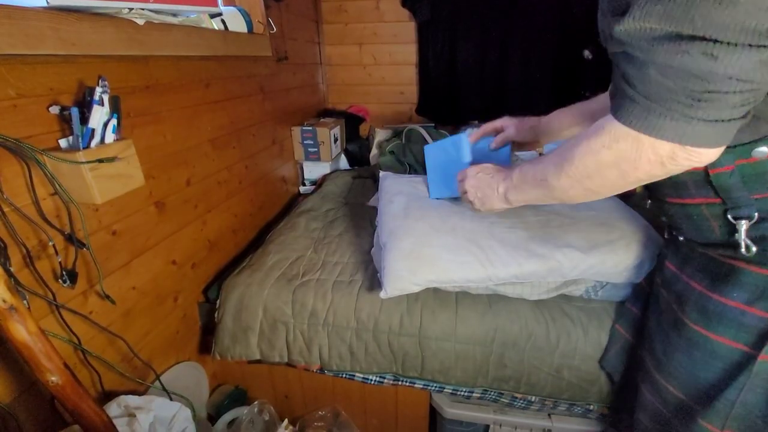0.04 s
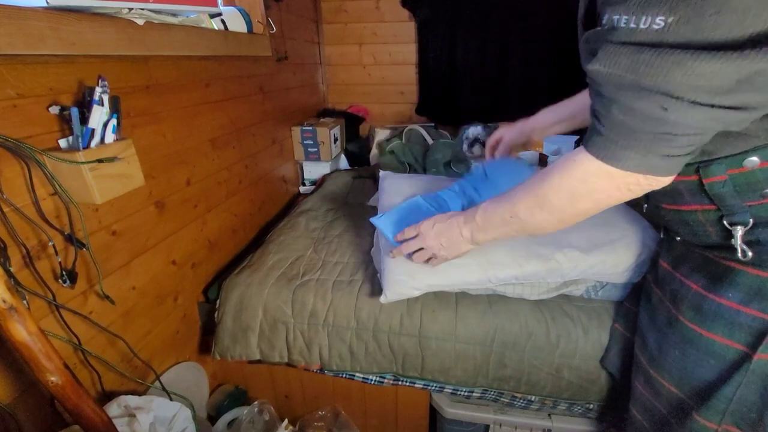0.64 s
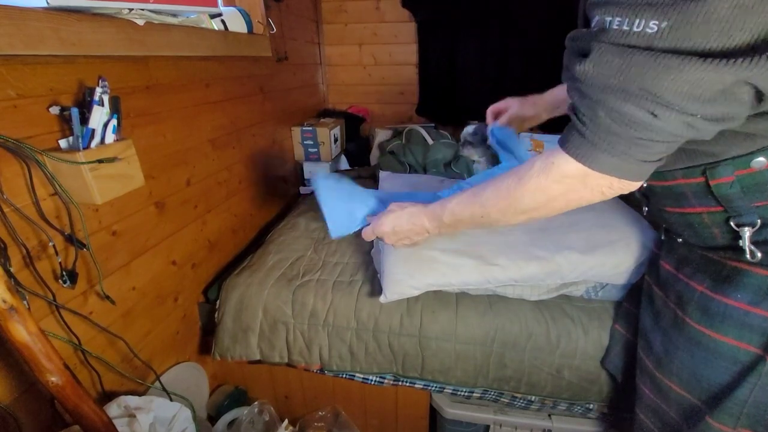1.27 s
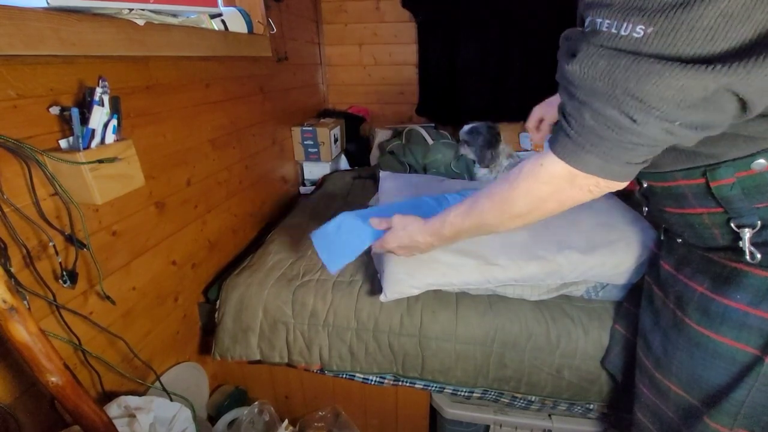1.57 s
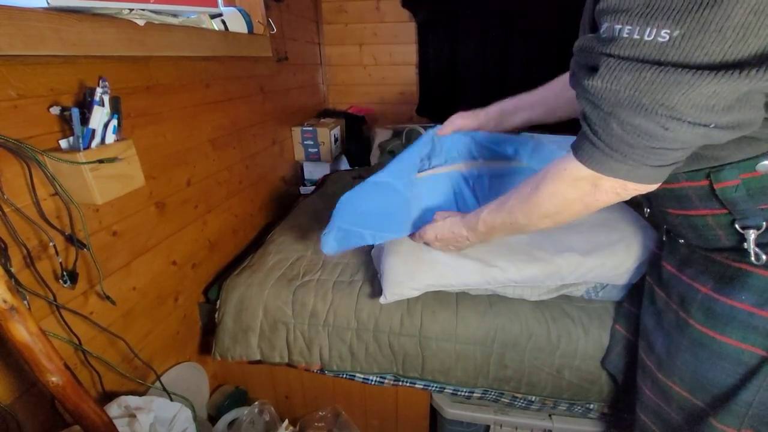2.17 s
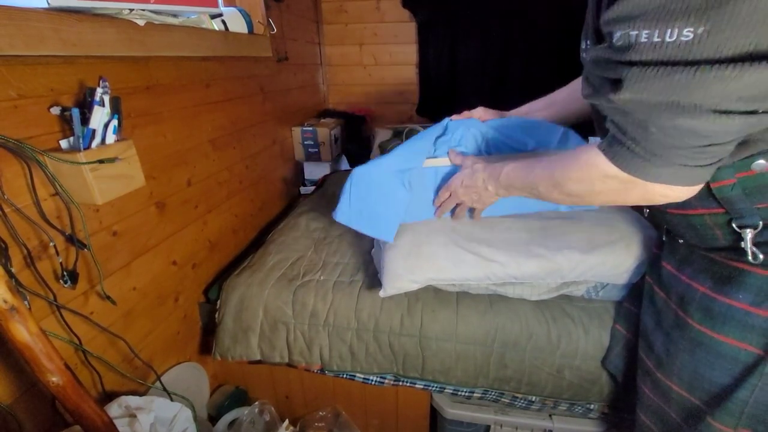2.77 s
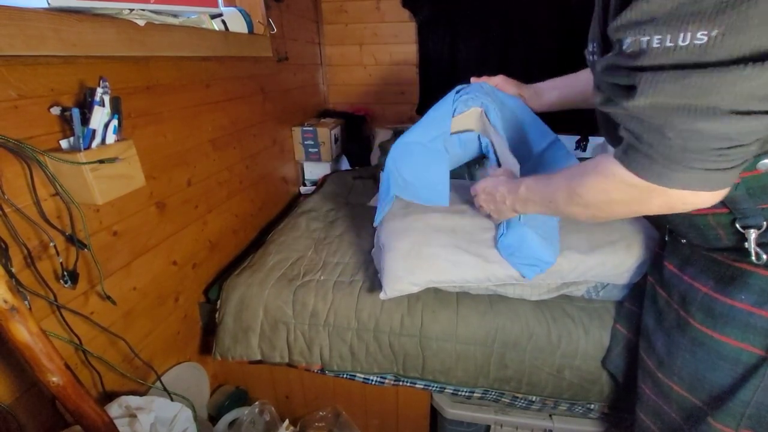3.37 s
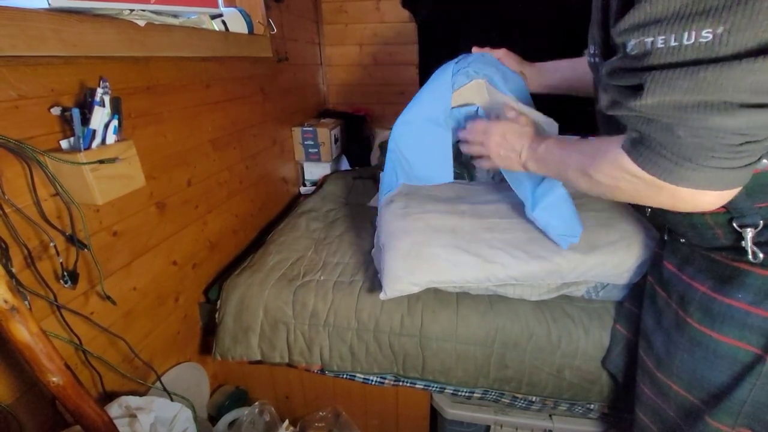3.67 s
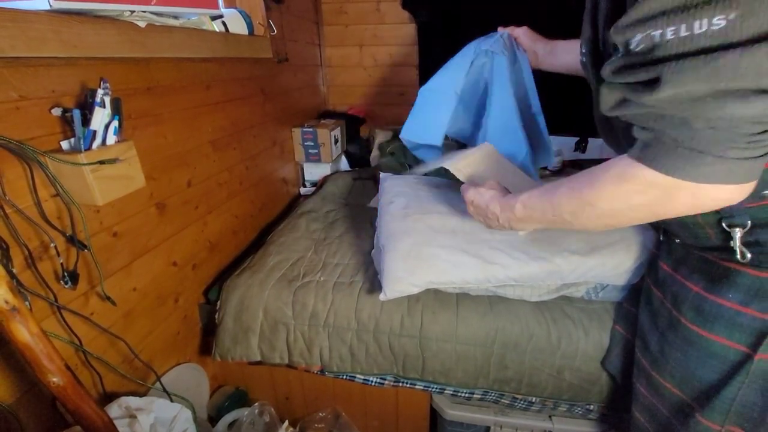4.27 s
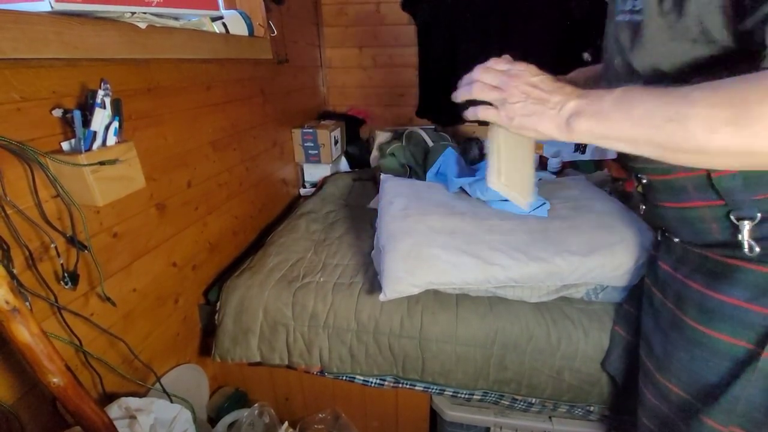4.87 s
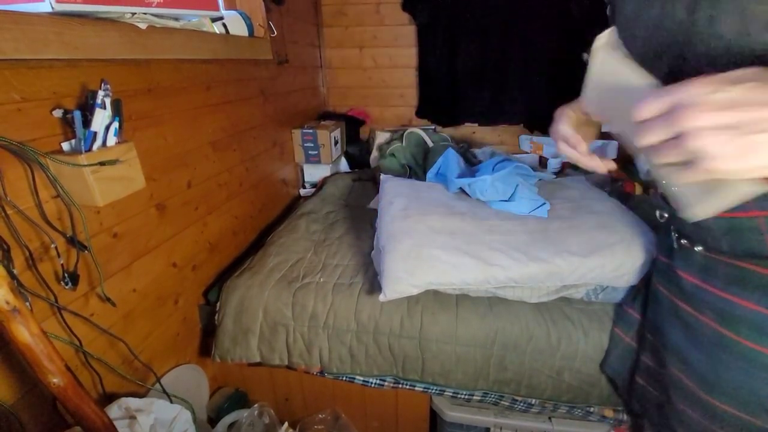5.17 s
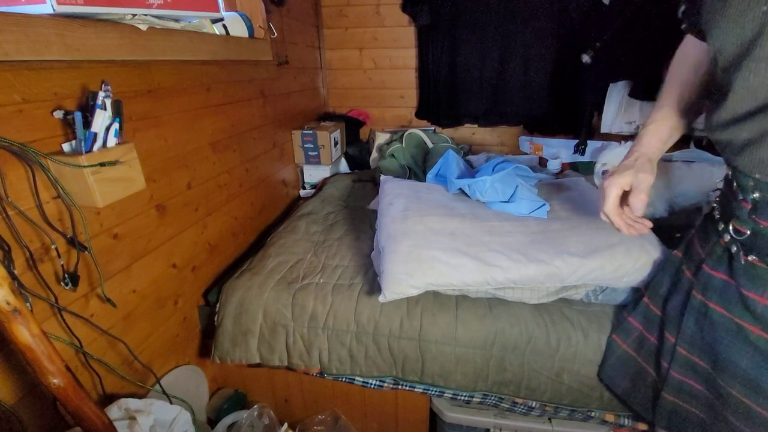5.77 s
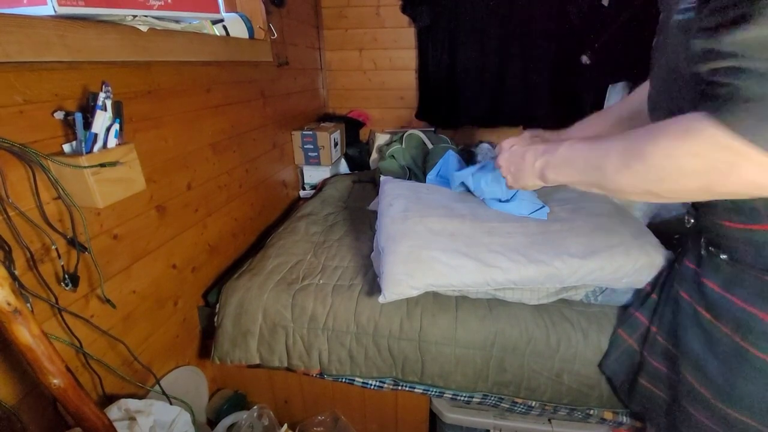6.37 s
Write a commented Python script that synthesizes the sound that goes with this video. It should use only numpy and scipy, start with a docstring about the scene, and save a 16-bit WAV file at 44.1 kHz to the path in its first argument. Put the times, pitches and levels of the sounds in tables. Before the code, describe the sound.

Soft fabric swishes, crinkles and hand thumps in a small room, ending with cardboard hitting floorboards as a vehicle nears outside.

```python
"""Unfolding a pillowcase

In a small wooden room, cloth slides over a pillow: stick-slip hiss and rub, creases flicking open,
stirred air booming and fluttering. The cardboard insert scrapes out, is knocked by the fingers and
lands ringing on the floorboards. Road noise through the walls swells at the end as a vehicle nears."""
import sys
import numpy as np
from scipy import signal
from scipy.fft import rfft, irfft, next_fast_len
from scipy.io import wavfile
from scipy.ndimage import uniform_filter1d, map_coordinates

SR = 44100
rng = np.random.default_rng(int(sys.argv[2]) if len(sys.argv) > 2 else 0)


def master(y):
    """Save y as 16-bit WAV."""
    cut = np.clip(np.atleast_2d(y).T, -1, 1)
    pcm = np.round(cut * 32767)  # scale
    wavfile.write(sys.argv[1], SR, pcm.astype(np.int16))


N = 287532

# cloth on cloth: start t/s, rise/s, fall/s, hiss level/dB, rub re hiss/dB
CLOTH_SLIDES = [(0.0, 0.0063, 0.11, -66, 7.5), (0.1, 0.052, 0.29, -72, 1), (0.54, 0.084, 0.056, -75, -5),
                (0.625, 0.03, 0.069, -66.5, -3), (0.75, 0.037, 0.35, -81, -7), (1.24, 0.061, .05, -76, -19),
                (1.45, 0.012, 0.023, -77, -6), (1.54, 0.048, .05, -74, -12),
                (1.665, 0.16, 0.029, -65.5, -15), (1.89, 0.063, 0.052, -75.5, -15),
                (2.04, 0.066, 0.052, -62.5, -13), (2.129, 0.037, 0.059, -55, -1.5),
                (2.235, 0.044, 0.23, -68, -10), (2.53, 0.012, 0.24, -63.5, -16.5),
                (2.669, 0.073, 0.1, -52.5, -5), (2.86, 0.057, .09, -62.5, -11),
                (3.05, 0.025, 0.071, -63.5, -9), (3.092, .008, 0.013, -55.5, -1),
                (3.185, 0.063, 0.066, -53.5, -7), (3.37, 0.016, 0.18, -62, -21),
                (3.57, 0.18, 0.036, -62.5, -7.5), (3.831, 0.073, 0.039, -53, -2),
                (3.92, 0.13, 0.089, -43, -6), (4.13, 0.059, 0.04, -49.5, -3.5),
                (4.321, 0.095, 0.072, -54.5, -6.5), (4.5, .02, 0.38, -78, 0)]
# thread hiss: f/Hz, density/dB
THREAD_SPECTRUM = [(1500, -17), (3500, -7.5), (5500, -1.5), (8000, -2.5), (9200, -3), (11500, 3.5),
                   (15500, 1.5), (17000, -6.5)]
# fold rub: f/Hz, density/dB
FOLD_SPECTRUM = [(100, -26), (300, 8), (700, 7), (1400, 7.5), (2100, 3), (3200, -1), (4600, -0.5),
                 (7000, -14), (14000, -52)]
def cloth_slide(grip_db):
    """Threads hiss and folds rub as the grip catches and lets go. Returns sound, hiss envelope."""
    hiss_env, rub_env = slide_envelopes(CLOTH_SLIDES)
    hiss = hiss_env * stick_slip(THREAD_SPECTRUM, slips_per_s=12000, scatter_db=1.5, drift_db=0.9)
    rub = rub_env * stick_slip(FOLD_SPECTRUM, slips_per_s=5000, scatter_db=1, drift_db=2.5)
    return amp(grip_db + 0.5) * hiss + amp(grip_db + 4.5) * rub, hiss_env


# card on cloth, sleeve or floor: start t/s, rise/s, fall/s, hiss level/dB, rasp re hiss/dB
CARD_SCRAPES = [(4.74, 0.052, 0.086, -46, 1), (4.962, 0.05, 0.04, -57.5, -2.5),
                (5.07, 0.11, 0.027, -51.5, -7), (5.195, 0.014, 0.08, -58.5, 5),
                (5.295, .07, 0.14, -51.5, -1.5), (5.52, 0.14, 0.0065, -53, -2), (5.88, .02, .05, -61, 7.5)]
# card rasp: f/Hz, density/dB
RASP_SPECTRUM = [(100, -14), (300, 10.5), (700, 8), (1400, 3), (2100, 2), (3200, 0.5), (4600, -2),
                 (7000, -11.5), (14000, -49)]
def card_scrape(grip_db):
    """Dragged card hisses and rasps by stick-slip. Returns sound, hiss envelope."""
    hiss_env, rasp_env = slide_envelopes(CARD_SCRAPES)
    hiss = hiss_env * stick_slip(THREAD_SPECTRUM, slips_per_s=12000, scatter_db=1.5, drift_db=0.9)
    rasp = rasp_env * stick_slip(RASP_SPECTRUM, slips_per_s=5000, scatter_db=1, drift_db=3.5)
    return amp(grip_db + 0.5) * hiss + amp(grip_db + 4.5) * rasp, hiss_env


def slide_envelopes(slides, swell_db=8.5, grab_db_per_s=656, release_db_per_s=376):
    """Each slide swells to its fastest moment and eases off. Returns hiss and rub envelopes."""
    t = np.arange(N) / SR
    hiss_power, rub_power = np.zeros((2, N))
    for start_s, rise_s, fall_s, level_db, rub_db in slides:
        past_peak_s = t - start_s - rise_s
        off_peak = np.clip(np.maximum(-past_peak_s / rise_s, past_peak_s / fall_s), 0, 1)
        before_db = grab_db_per_s * np.maximum(start_s - t, 0)
        after_db = release_db_per_s * np.maximum(past_peak_s - fall_s, 0)
        power = amp(level_db - swell_db * off_peak ** 2 - np.minimum(before_db + after_db, 120)) ** 2
        hiss_power += power
        rub_power += power * amp(rub_db) ** 2
    return np.sqrt(hiss_power), np.sqrt(rub_power)


def stick_slip(spectrum, slips_per_s, scatter_db, drift_db):
    """Dense tiny releases of uneven size; the colour drifts as folds open and close."""
    sizes = (rng.random(N) < slips_per_s / SR) * amp(scatter_db * rng.standard_normal(N))
    slips = stereo(sizes * white(), lambda hz: amp(at_hz(spectrum, hz)))
    return colour_drift(slips, drift_db)


# creases opening: t/s, level/dB, centre f/Hz
CREASES = [(0.9872, -61.5, 11700), (2.126, -39.5, 13600), (2.6763, -41, 12500), (3.043, -52, 12100),
           (3.092, -44, 14600), (3.367, -46, 7990), (3.574, -51.5, 9370), (3.611, -49.5, 14600),
           (3.6697, -41.5, 15000), (3.725, -41.5, 13900), (3.7435, -43, 12100), (3.8223, -44, 10300),
           (3.872, -38, 3360), (4.212, -35.5, 12600), (4.312, -50, 10700), (4.8676, -26.5, 8100),
           (4.873, -36, 7670), (4.9751, -44, 11300), (5.018, -38, 14160), (5.956, -41, 5200)]
def crease_flicks():
    """A crease pops open in a short burst, brightest around a pitch set by its size."""
    out, t = np.zeros((2, N)), np.arange(SR // 4) / SR
    shape = [(0.12, -20), (0.73, -7), (1, 0), (1.15, -3), (2, -7)]  # f/centre, density/dB
    for start_s, level_db, centre_hz in CREASES:
        spectrum = [(ratio * centre_hz, db) for ratio, db in shape]
        pop = burst(spectrum, t, t60_s=0.077, spike=1.7)
        threads = amp(-8.5) * burst(THREAD_SPECTRUM, t, t60_s=0.091)
        add(out, start_s, amp(level_db - 8.5) * (pop + threads))
    return out


# swings of sheet and arms: t/s, level/dB
AIR_PUFFS = [(0.03, -53.5), (0.76, -57), (1.28, -65), (1.6, -58.5), (1.84, -64), (2.14, -50), (2.789, -50),
             (2.97, -50), (3.28, -50), (3.54, -50.5), (3.85, -47), (4.09, -45.5), (4.27, -54),
             (4.48, -48.5), (4.61, -46.5), (4.88, -43.5), (5.0, -51), (5.19, -41), (5.66, -43)]
# stirred air: f/Hz, density/dB
BOOM_SPECTRUM = [(15, -44), (28, -18), (45, -8.5), (62, 10), (85, 2), (105, -4), (140, 1.5), (175, -27),
                 (260, -66)]
# flapping sheet: f/Hz, density/dB
FLUTTER_SPECTRUM = [(90, -23), (160, -12.5), (220, 0.5), (290, -8.5), (400, -5.5), (520, -23), (900, -57)]
def billow(slide_env, follow_s=0.12, puff_half_s=0.044, brisk_db=-50, taut_db=-64.5):
    """The sheet booms more the faster it slides; flutter grows until it is taut; swings puff air."""
    t = np.arange(N) / SR
    stir = np.abs(uniform_filter1d(slide_env, size=int(follow_s * SR)))
    puffs = sum(amp(db) / (1 + ((t - peak_s) / puff_half_s) ** 4) for peak_s, db in AIR_PUFFS)
    boom_env = amp(-54.5) * (stir / amp(brisk_db)) ** 0.4
    boom = np.hypot(boom_env, puffs) * amp(1.4 * wobble(12)) * noise(BOOM_SPECTRUM)
    tautness = stir / np.hypot(stir, amp(taut_db))
    flutter = amp(-57.5 + 1.6 * wobble(25)) * tautness * noise(FLUTTER_SPECTRUM)
    return boom + flutter


# hands on pillow and card: t/s, level/dB, f/Hz, slap/dB, tick/dB, thump t60/s
HAND_HITS = [(0.006, -35, 671, -9, -20.5, .07), (0.012, -37.5, 131.4, -25, -41, 0.19),
             (0.649, -39.5, 335, -2.5, -42, 0.094), (0.684, -31, 285, -12, -46, 0.063),
             (0.688, -37.5, 428, -11, -31, 0.047), (0.987, -60, 404, 5, -10, .08),
             (1.595, -37, 300, -24.5, -38, 0.075), (3.825, -38, 287, 0.5, -21.5, 0.063),
             (4.372, -36, 424, -17, -25, 0.053), (4.887, -30.5, 425, 0, -10, 0.03),
             (5.054, -34, 456, -3.5, -6.5, 0.099), (5.191, -31, 279, -15, -16, 0.059)]
# skin slap: f/Hz, density/dB
SLAP_SPECTRUM = [(200, 7), (600, 10.5), (1500, 2.5), (2500, -15), (5000, -35), (15000, -21)]
# struck card: f/Hz, density/dB
CRACK_SPECTRUM = [(25, -13), (70, 0), (300, 8), (900, 1), (1900, -3), (3000, -8.5), (5000, -6), (8000, -15),
                  (12000, -15.5), (16000, -18)]
def hand_knocks():
    """A hand gives a dull thump, a slap of skin and a tick on the stiff card."""
    out, t = np.zeros((2, N)), np.arange(SR // 4) / SR
    for start_s, level_db, pitch_hz, slap_db, tick_db, t60_s in HAND_HITS:
        body = stereo(white(len(t)), lambda hz: resonance(hz, pitch_hz, 0.8 * pitch_hz) ** 2)
        tone = np.sin(2 * np.pi * pitch_hz * t)
        thump = (0.5 * body + 0.87 * tone) * decay(t, 0.0022, t60_s)
        slap = amp(slap_db - 3) * burst(SLAP_SPECTRUM, t, t60_s=0.069, spike=6.4)
        tick = amp(tick_db + 4) * burst(CRACK_SPECTRUM, t, t60_s=0.13, spike=8.4)
        add(out, start_s, amp(level_db - 0.5) * (thump + slap + tick))
    return out


# card on floor, edge first, then flat: t/s, level/dB, crack/dB, thud/dB
FLOOR_CONTACTS = [(5.820, -24.5, 4.5, 7), (5.837, -32, 11.5, -7), (5.843, -17, -17, -2.5),
                  (5.8464, -9, -8.5, -14.5), (5.856, -23.5, -16, 2)]
# card and floorboard modes: f/Hz, level/dB, t60/s
CARD_FLOOR_MODES = [(120, -7.5, 0.16), (170.4, -6, 0.27), (242, -11.5, 0.12), (330, -21, 0.3),
                    (437.5, -9.5, 0.16), (521, -12.5, 0.15), (734, -9, 0.09), (803, -13, 0.073),
                    (1053, -11.5, .1), (1345, 3, 0.056), (1382, -5, 0.039), (1585, -9.5, 0.049),
                    (1686, -10, 0.054), (2470, -2.5, 0.034), (2370, -23, 0.047), (3770, -15, 0.036)]
def card_landing(thud_hz=86, skid_start_s=5.843):
    """Contacts crack, ring card and boards, and thud with a puff of trapped air; the card skids."""
    out, t = np.zeros((2, N)), np.arange(SR // 2) / SR
    for start_s, level_db, crack_db, thud_db in FLOOR_CONTACTS:
        ring = np.zeros((2, len(t)))
        for hz, mode_db, t60_s in CARD_FLOOR_MODES:
            envelope = amp(mode_db + rng.normal(0, 1)) * decay(t, 0.00043, t60_s)
            channel_phase = min(hz / 900, 1) * rng.normal(0, 1, (2, 1))
            ring += envelope * np.sin(2 * np.pi * hz * t + channel_phase)
        crack = amp(crack_db) * burst(CRACK_SPECTRUM, t, t60_s=0.067, spike=8.3)
        thud = np.sin(2 * np.pi * thud_hz * t) * decay(t, attack_s=0.01, t60_s=0.25)
        puff = amp(-4) * burst(FLUTTER_SPECTRUM, t, t60_s=0.2)
        add(out, start_s, amp(level_db - 8) * (ring + crack + amp(thud_db) * (thud + puff)))
    skid_rasp = burst(RASP_SPECTRUM, t, t60_s=0.12)
    skid_hiss = amp(-8.5) * burst(THREAD_SPECTRUM, t, t60_s=0.11)
    add(out, skid_start_s, amp(-24) * (skid_rasp + skid_hiss))
    return out


# nearby boards: left delay/s, right delay/s, level/dB
PANEL_ECHOES = [(.0011, 0.0016, -28), (.0027, 0.0029, -13), (.0046, .0051, -6), (.0093, 0.0059, -15.5)]
def panelling(x, low_hz=400, high_hz=8000):
    """Early reflections comb the midrange; their top treble is scattered away."""
    def response(hz):
        echoes = sum(amp(db) * np.exp(-2j * np.pi * hz * np.array([[left_s], [right_s]]))
                     for left_s, right_s, db in PANEL_ECHOES)
        return 1 + echoes * hz / (hz + low_hz) / (1 + (hz / high_hz) ** 2)
    return filtered(x, response)


# room decay: f/Hz, t60/s
WALL_DECAY = [(100, 0.81), (500, 0.25), (3000, 0.062), (8000, 0.24), (15000, 0.23)]
def room_reverb(x, predelay_samples=200):
    """Wooden walls return a short tail, different in each channel."""
    hz, t, bins = signal.stft(white(SR // 2), SR, nperseg=256)
    decay_db = -60 * t / at_hz(WALL_DECAY, hz)[:, None]
    tail = signal.istft(bins * amp(decay_db), SR, nperseg=256)[1]
    tail = np.pad(tail / np.linalg.norm(tail[0]), ((0, 0), (predelay_samples, 0)))
    return signal.fftconvolve(x, tail, axes=1)[:, :N]


# vehicle approach: t/s, tyre level/dB, engine level/dB
APPROACH = [(0.0, -65.5, -65.5), (1.2, -68, -69), (2.7, -61.5, -59), (4.5, -58.5, -53), (5.65, -55, -46),
            (5.95, -48, -42.5), (6.25, -44.5, -40), (6.52, -40, -38)]
# far road: f/Hz, density/dB
FAR_ROAD_SPECTRUM = [(200, -10.5), (400, -1.5), (520, -13), (720, -4.5), (980, 3), (1350, -9),
                     (1800, -18.5), (2800, -34)]
# tyres through walls: f/Hz, density/dB
TYRE_SPECTRUM = [(150, -12.5), (330, -4.5), (500, 1), (700, 2.5), (1000, -2), (1300, -8), (1800, -13),
                 (2600, -28.5), (4500, -40), (6500, -47.5), (8500, -72), (15000, -82)]
# low room modes: f/Hz, width/Hz, level/dB
BASS_MODES = [(31, 9, -17), (65.7, 27, 2.5), (119.8, 30, -0.5), (141, 9.4, -6.5), (225.7, 16, -1.5),
              (302, 51, -12.5)]
def traffic():
    """A steady far road; a nearing vehicle adds tyre roar, rough whine and rumble that rings the room."""
    tyre_db, engine_db = curves(APPROACH)
    nearness_db = tyre_db - tyre_db.max()
    far = amp(-65 + 0.17 * wobble(6.2)) * noise(FAR_ROAD_SPECTRUM)
    roar_db = tyre_db + 0.14 * nearness_db + 0.19 * wobble(5.3) + 4
    roar = colour_drift(noise(TYRE_SPECTRUM), depth_db=0.34)
    whine_db = tyre_db + 0.56 * nearness_db + 1.9 * wobble(11) + 0.5
    whine = stereo(white(), lambda hz: resonance(hz, centre_hz=506.7, width_hz=29) ** 2)
    rumble = stereo(white(), lambda hz: sum(amp(db) * abs(resonance(hz, centre_hz, width_hz)) ** 2
                                            for centre_hz, width_hz, db in BASS_MODES))
    return far + amp(roar_db) * roar + amp(whine_db) * whine + amp(engine_db) * rumble


def hum(start_s=0.059, start_hz=239, sag_hz_per_s=130):
    """A faint low hum swells, sags in pitch and dies."""
    t = np.maximum(np.arange(N) / SR - start_s, 0)
    pitch_hz = np.maximum(start_hz - sag_hz_per_s * t, start_hz / 2)
    tone = np.sin(2 * np.pi * np.cumsum(pitch_hz) / SR)
    return amp(-47) * decay(t, attack_s=0.06, t60_s=0.67) * tone


# microphone noise: f/Hz, density/dB
MIC_SPECTRUM = [(100, 0), (3000, -1), (8000, 0), (16000, 0)]
def mic_hiss():
    """Steady, nearly white self-noise."""
    return amp(-82) * noise(MIC_SPECTRUM)


# left-right likeness: f/Hz, correlation
CORRELATION = [(60, 0.97), (130, 0.83), (250, 0.94), (500, 0.36), (1000, -0.22), (4000, 0.0028),
               (15000, 0.000045)]
def stereo(pair, response):
    """Two independent signals, coloured and mixed to rms 1: bass shared, treble apart."""
    def mid_side_response(hz):
        angle = np.arccos(np.clip(at_hz(CORRELATION, hz), -1, 1)) / 2
        return response(hz) * [np.cos(angle), np.sin(angle)]
    mid, side = filtered(pair, mid_side_response)
    return unit_rms(np.array([mid + side, mid - side]))


def white(size=N):
    """Two channels of white noise."""
    return rng.standard_normal((2, size))


def noise(spectrum):
    """Coloured stereo noise, rms 1."""
    return stereo(white(), lambda hz: amp(at_hz(spectrum, hz)))


def burst(spectrum, t, t60_s, spike=0):
    """Dying noise, led by an optional pressure spike."""
    scatter = white(len(t)) * amp(-60 * t / t60_s)
    scatter[0, 0] += spike
    scatter = np.roll(scatter, 16, axis=1)  # room for the filter's pre-ring
    return stereo(scatter, lambda hz: amp(at_hz(spectrum, hz))) * np.sqrt(np.mean(scatter ** 2))


def colour_drift(x, depth_db):
    """Smooth random gain over time and frequency; output rms 1."""
    bins = signal.stft(x, nperseg=512)[2]
    field = rng.standard_normal(bins.shape[1:])
    for _ in range(2):
        field = uniform_filter1d(field, size=14, axis=0)
        field = uniform_filter1d(field, size=9, axis=1)
    drifted = signal.istft(bins * amp(depth_db * unit_rms(field)), nperseg=512)[1]
    return unit_rms(drifted[:, :N])


def wobble(knots_per_s):
    """Smooth random curve."""
    knots = rng.standard_normal(int(N * knots_per_s / SR) + 4)
    return map_coordinates(knots, [np.arange(N) * knots_per_s / SR])


def filtered(x, response):
    """Apply a frequency response by padded FFT."""
    size = x.shape[-1]
    padded = next_fast_len(size + 8192)
    hz = np.fft.rfftfreq(padded, 1 / SR)
    return irfft(rfft(x, padded) * response(hz), padded)[..., :size]


def resonance(hz, centre_hz, width_hz):
    """Causal response of one mode."""
    return 1j * hz * width_hz / (centre_hz ** 2 - hz ** 2 + 1j * hz * width_hz)


def decay(t, attack_s, t60_s):
    """Quick rise, exponential fall."""
    return (1 - np.exp(-t / attack_s)) * amp(-60 * t / t60_s)


def at_hz(points, hz):
    """Interpolate on a log frequency axis."""
    knots_hz, values = np.transpose(points)
    return np.interp(np.log(hz + 1), np.log(knots_hz + 1), values)


def curves(rows):
    """Per-sample curve for each column after the time."""
    times_s, *columns = np.transpose(rows)
    return [np.interp(np.arange(N) / SR, times_s, column) for column in columns]


def amp(db):
    """Decibels to gain."""
    return 10 ** (np.asarray(db) / 20)


def unit_rms(x):
    """Scale to rms 1."""
    return x / np.sqrt(np.mean(x ** 2) + 1e-20)


def add(track, start_s, sound):
    """Mix a sound into the track."""
    part = track[:, round(start_s * SR):][:, :sound.shape[-1]]
    part += sound[..., :part.shape[-1]]


# cloth position: t/s, left re right/dB
CLOTH_PAN = [(0.0, 5), (1.6, 6.5), (2.7, 1.5), (4.2, 2), (5.5, -2)]
def scene():
    """Cloth and card in the room, over traffic, a brief hum and microphone hiss."""
    pan_db, = curves(CLOTH_PAN)
    pan = amp(np.array([pan_db, -pan_db]) / 2)
    hits = crease_flicks() * pan + hand_knocks() + card_landing()
    grip_db = wobble(45) + 0.68 * wobble(220)
    cloth, cloth_env = cloth_slide(grip_db)
    card, card_env = card_scrape(grip_db)
    near = amp(-1) * panelling((cloth + card) * pan + hits)
    air = billow(np.hypot(cloth_env, card_env))
    return near + air + amp(-19.5) * room_reverb(hits) + traffic() + hum() + mic_hiss()


# microphone imbalance: f/Hz, left re right/dB
MIC_BALANCE = [(60, 1.2), (120, -3), (220, -3), (450, -2), (1200, -0.5), (2400, 0.5), (4500, 0), (8000, 9),
               (14000, 3)]
def record(dry, top_hz=15900, fade_out_s=0.004):
    """Band-limited pickup; the two channels differ in colour."""
    def response(hz):
        balance_db = at_hz(MIC_BALANCE, hz)
        return amp(np.array([balance_db, -balance_db]) / 2) * (hz < top_hz)
    fade_out = np.minimum(np.arange(N, 0, -1) / (fade_out_s * SR), 1)
    return filtered(dry * fade_out, response)


dry = scene()
out = record(dry)
master(out)
```